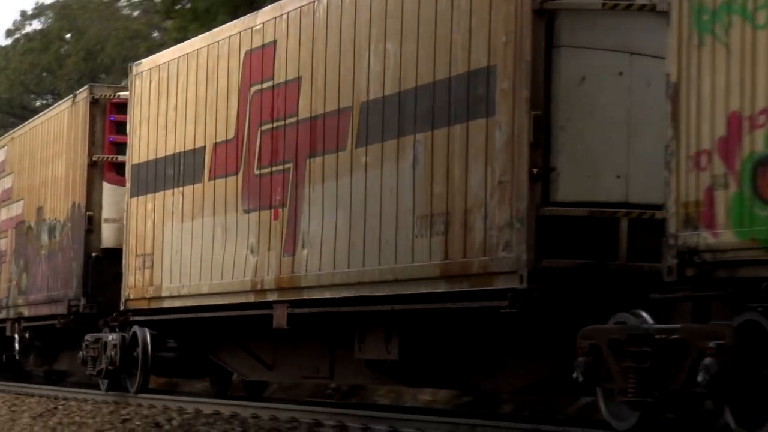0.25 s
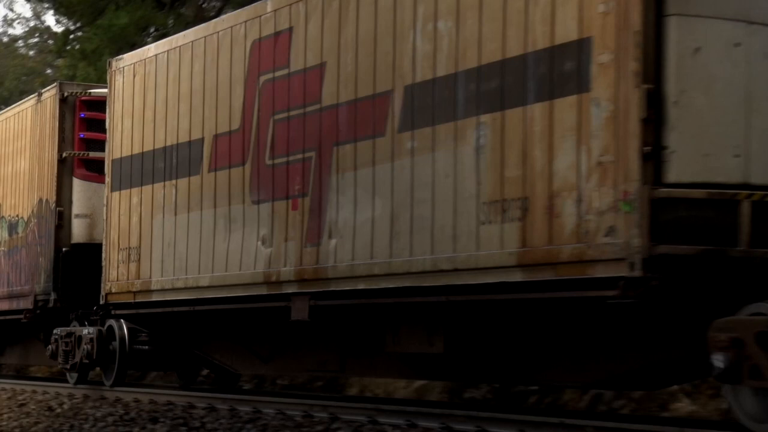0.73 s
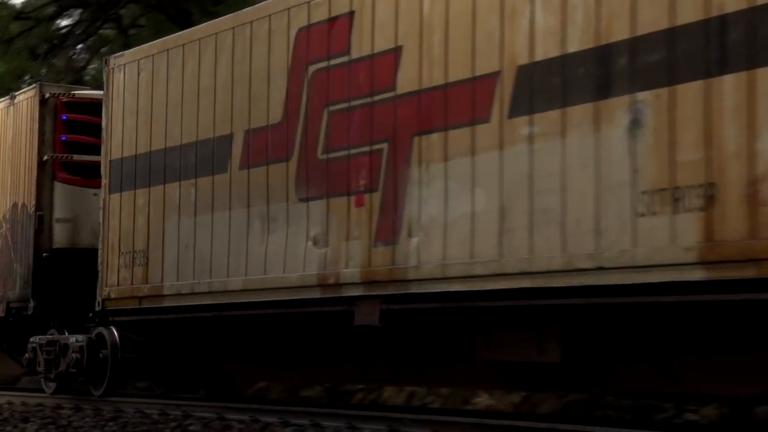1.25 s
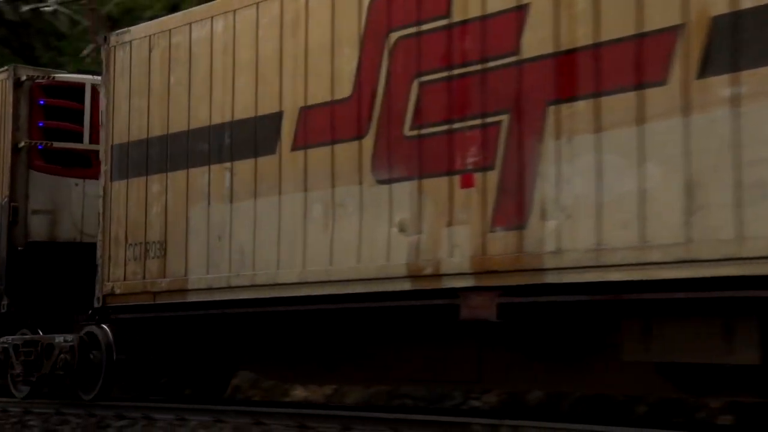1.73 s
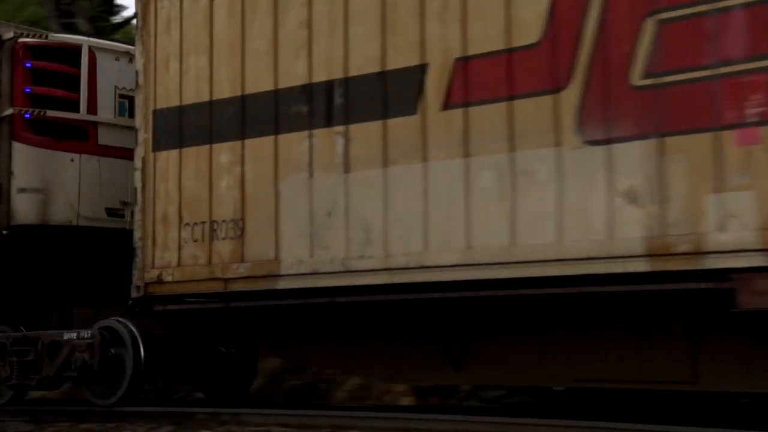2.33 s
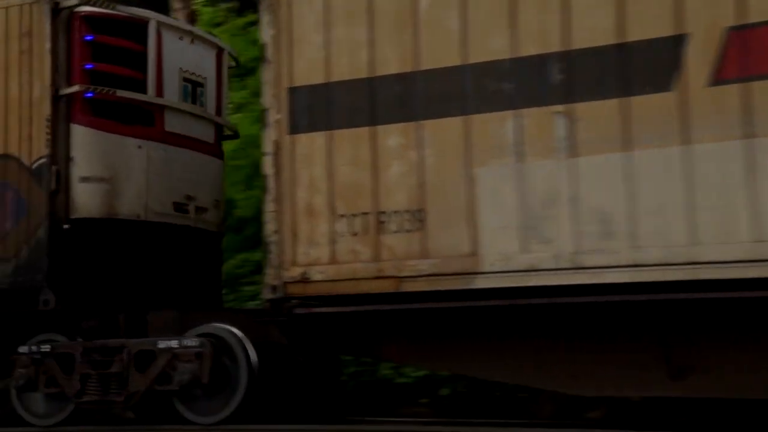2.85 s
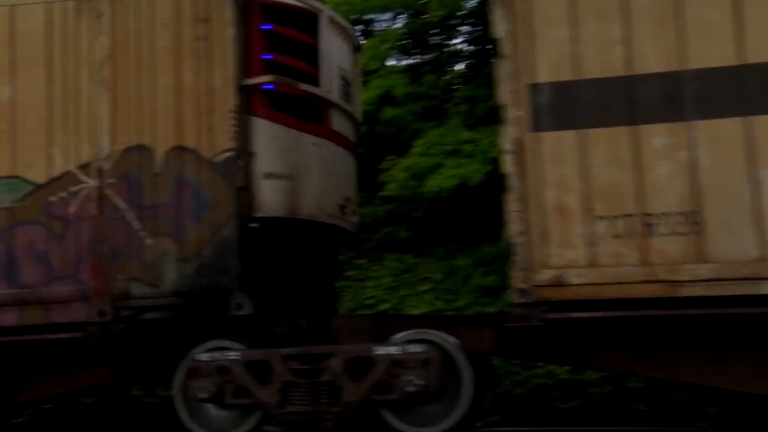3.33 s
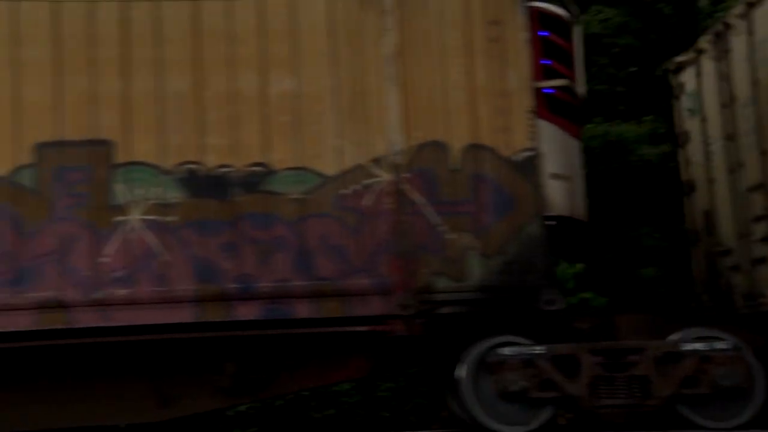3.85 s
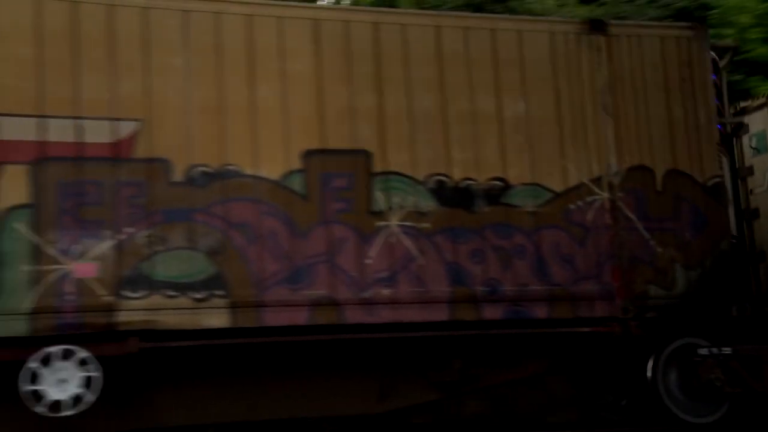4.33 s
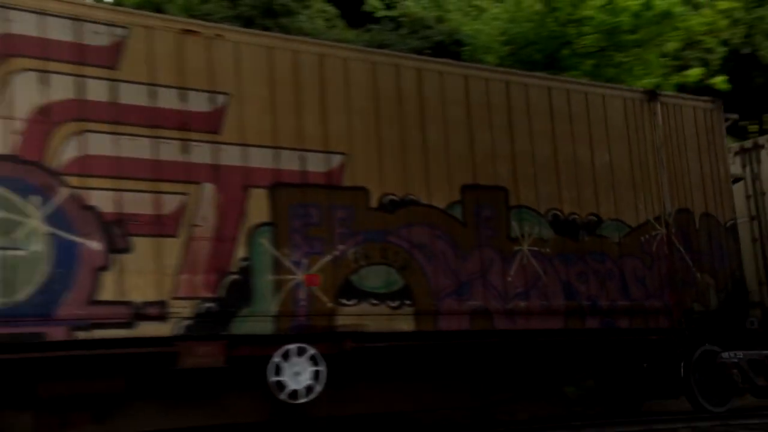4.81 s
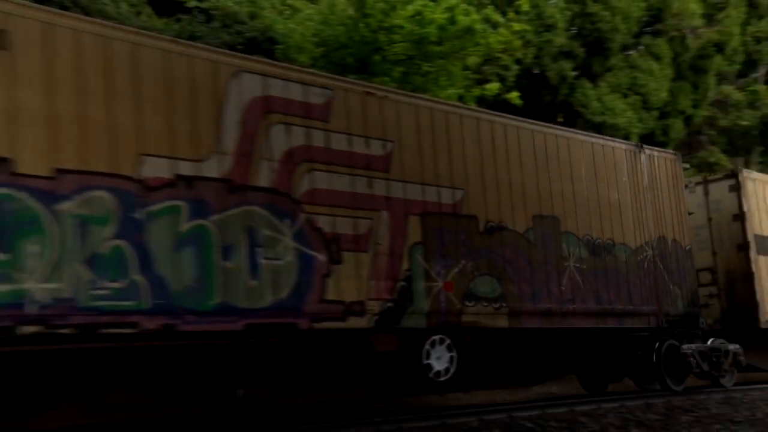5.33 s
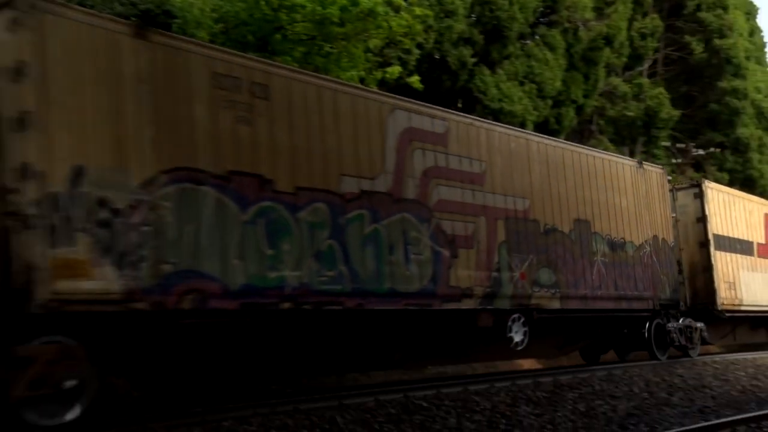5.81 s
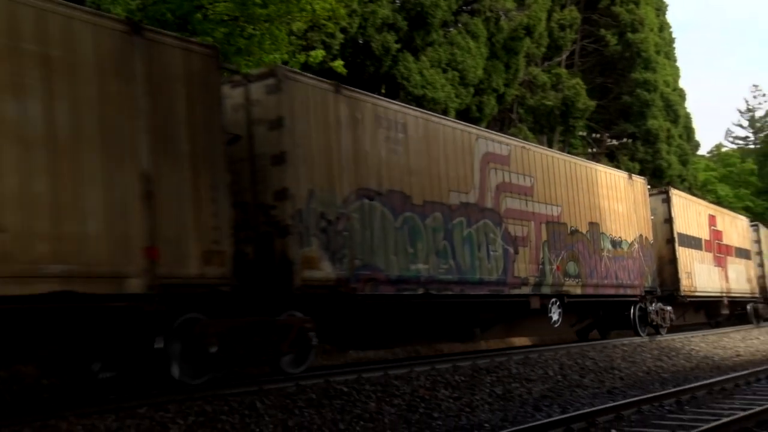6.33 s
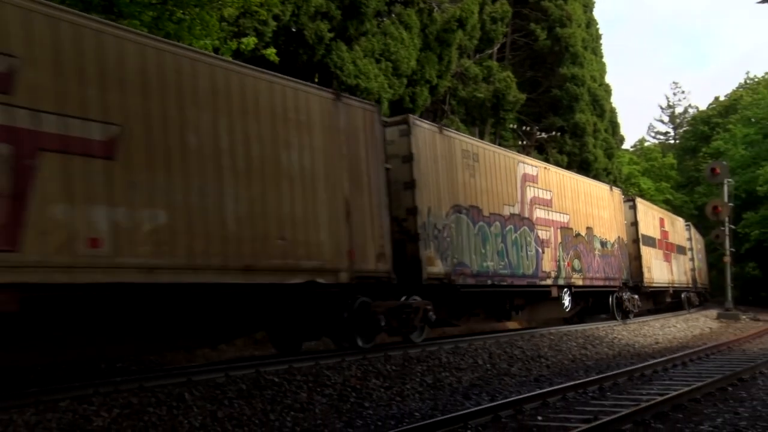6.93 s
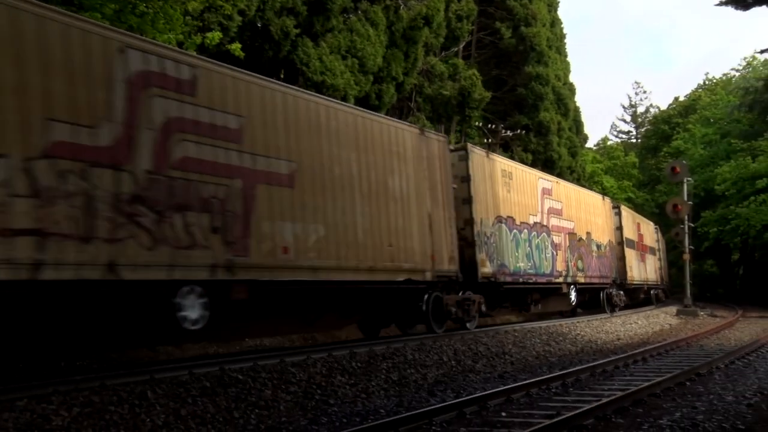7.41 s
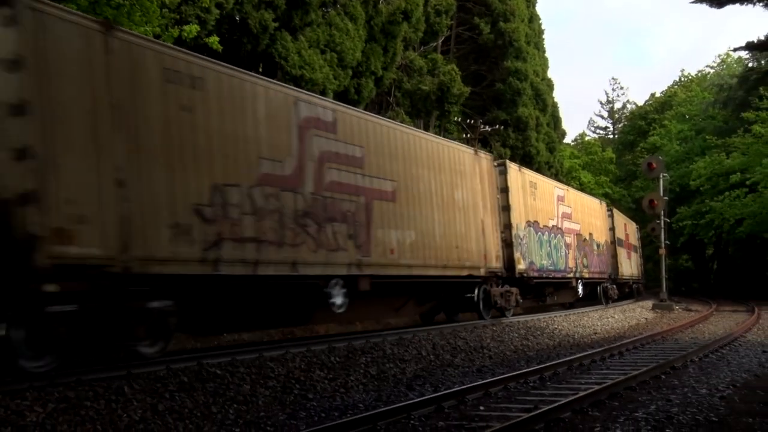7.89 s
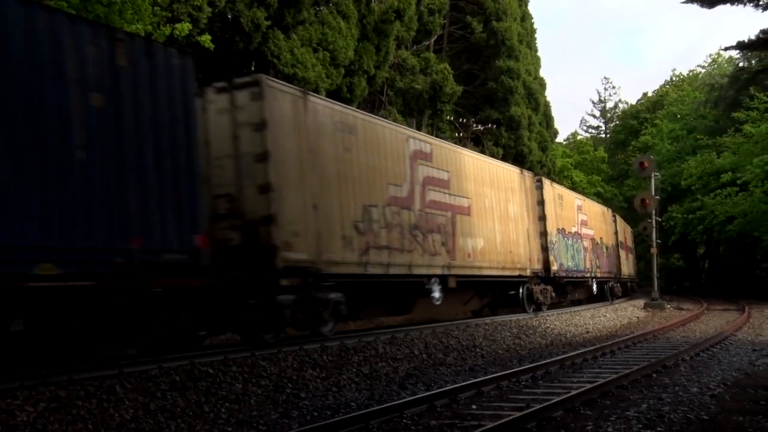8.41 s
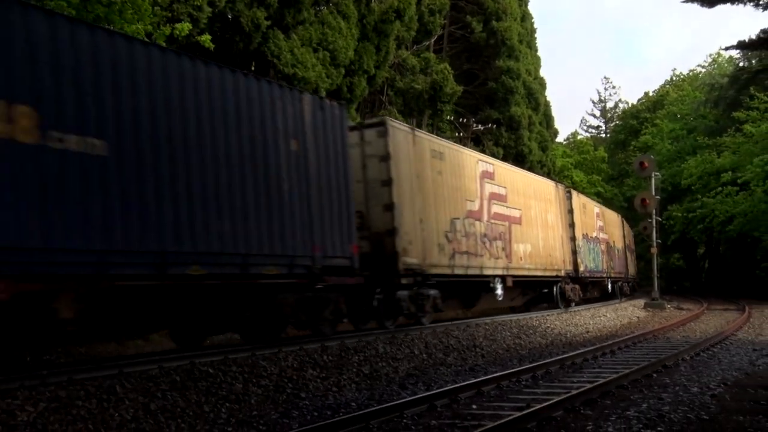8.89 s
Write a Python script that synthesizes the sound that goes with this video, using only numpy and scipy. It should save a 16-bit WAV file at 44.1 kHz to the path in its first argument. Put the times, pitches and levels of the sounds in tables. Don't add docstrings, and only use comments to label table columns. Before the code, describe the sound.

Open air, close beside a railway bend, with a fixed stereo microphone. A freight train is already passing at moderate speed. From 0 s a piercing squeal around 3.2 kHz dominates, rough and fluttering with tiny dropouts, loudest near 1.4 to 2.1 s and slightly overloaded. Its pitch slides down a little as the wheel passes at about 1.8 s; it then weakens, stutters and lets go around 3.1 s. Beneath run low rumble, mid rail roar and bright gritty flange friction. Very high, glassy squeals flare at the start, near 2 s and sharply at 3.4 s, while the main squeal faintly catches again from 3.6 to 5 s. Another thin squeal bursts at 5.2 s and a short one at 7.2 s. Friction thins to a soft hiss over rumble; from about 8 s, dull knocks and short metallic rings cluster, the heaviest low clunk near 9 s.

```python
import sys
import numpy as np
from scipy import signal
from scipy.io import wavfile
from scipy.ndimage import uniform_filter1d, map_coordinates

SR = 44100
rng = np.random.default_rng(int(sys.argv[2]) if len(sys.argv) > 2 else 0)


def log_audio(samples):
    frames = np.atleast_2d(samples).T
    limited = np.clip(frames, -1, 1)
    pcm = np.round(limited * 32767).astype(np.int16)
    wavfile.write(sys.argv[1], SR, pcm)


def undo_db(level):
    steps = np.asarray(level, float) / 20
    return 10 ** steps


N = 403515
TIME = np.arange(N) / SR

SPEED, DISTANCE, SOUND = 8.9, 9.8, 343

# (time [s], level [dB])
TRACK_LOAD = [
    (0.0, -35),
    (1.9, -35),
    (3.64, -38),
    (7.16, -40),
    (8.31, -37),
    (9.15, -35.5),
]
# (frequency [Hz], density [dB per Hz])
RUMBLE_COLOUR = [(21, -35), (36, -4.5), (65, -8), (97, 0.5), (124, -2), (187, -5), (226, -10.5),
                 (258, -15.5), (300, -20.5), (390, -51), (660, -120)]
# (frequency [Hz], density [dB per Hz])
RAIL_COLOUR = [(200, -28), (300, -8), (450, -4.5), (800, -3), (1100, -1), (1500, -3), (2200, -33)]
# (time [s], thud peak [dB], ring level [dB], ring frequency [Hz])
JOINTS = [
    (7.965, -26, -29, 1195),
    (8.36, -35, -36, 1240),
    (8.6, -25, -32, 1220),
    (8.73, -32, -32, 2140),
    (9.056, -24, -30, 473),
    (9.045, -44, -25, 2180),
]
# (time [s], flange pressure [dB], left over right [dB])
FLANGE = [(0.0, -29, -1.5), (0.97, -28, 0), (1.4, -27, -0.5), (1.65, -28, -0.5), (1.96, -28, -1),
          (3.82, -24, 0.0), (5.35, -29.5, 3), (5.73, -28, 3.0), (7.11, -32.5, 1), (7.31, -34.5, 1),
          (8.64, -38, 1), (9.15, -37, 1)]
USUAL_DB = -30
# (frequency [Hz], density [dB per Hz])
BODY_COLOUR = [(800, -45), (1200, -22), (1600, -4), (1850, 0.5), (2700, -1), (3600, 1), (4400, -22)]
# (frequency [Hz], density [dB per Hz])
FIZZ_COLOUR = [(3000, -38), (3900, -0.5), (4600, 2), (7000, -3.5), (9500, -4), (11400, -11), (12500, -32)]
# (frequency [Hz], density [dB per Hz])
TOP_COLOUR = [(10500, -30), (11600, 0.5), (14000, 1), (15700, -5), (17000, -10)]
# (level at middle pressure [dB], slope [dB per dB of pressure], drift [dB per s])
BODY_LAW = (-33.5, .85, 0.14)
FIZZ_LAW = (-30.5, 1.01, 0.013)
TOP_LAW = (-35.5, 1.1, -0.67)
RAIL_LAW = (-44, 0.69, 0.19)
BOGIE_PASSES = [-43, -7.5, -1.6, 0.5, 4, 5.4, 7.5, 9.5, 13.5]
# (frequency [Hz], width [Hz], level [dB])
WHEEL_MODES = [(1220, 17, -10.5), (1803, 64, -15.5), (2180, 68, -11.5), (2580, 73, -10), (4300, 41, -12.5),
               (5020, 26, -7.5), (5447, 63, -8), (5980, 50, -13), (6660, 120, -7.5), (7750, 180, -8.5),
               (8805, 120, -8.5), (9890, 80, -9), (10835, 96, -4), (12900, 150, -22), (13700, 140, -33),
               (14400, 150, -20)]

# (rest frequency [Hz], passing time [s])
LONG_WHEELS = [(10941, .25), (10935, 2), (11060, 3.5), (10952, 3.5), (10941, 5.35), (7740, .05),
               (7848, 3.6), (7752, 6.95)]
# (peak time [s], peak level [dB], rise [dB per s], fall [dB per s])
LONG_BURSTS = [
    [(0.0, -18, 21, 9), (1.8, -34, 8, 12)],
    [(1.9, -25, 30, 5), (3.0, -27, 3, 7)],
    [(3.3, -27, 9, 30), (2.2, -30, 40, 11)],
    [(3.43, -10.5, 38, 130), (2.8, -25, 15, 8), (3.77, -27, 40, 30)],
    [(5.23, -22, 30, 75), (4.9, -33, 6, 9), (6.3, -39, 12, 9)],
    [(0.0, -19.5, 21, 6), (.6, -25, 3, 13)],
    [(2.2, -26, 90, 50), (3.3, -23.5, 35, 33), (4.0, -27, 22, 35), (4.4, -31, 21, 45)],
    [(7.2, -19, 75, 95)],
]
LONG_LEAD = [2.4, 1.0, 0.01, -.15, 5.3, 4.6, .01, 3.9]
LONG_SCRAPE = [.35, .15, .2, .25, .2, .8, .3, .2]
REACH_S = 2.4
# (start time [s], length [s], rest frequency [Hz], passing time [s],
# level [dB])
FAINT_SQUEALS = [(4.5, .6, 7813, 5.35, -37), (5.3, .7, 7734, 3.7, -39), (4.9, .55, 10005, 5.35, -32),
                 (7.05, .35, 9889, 7.0, -42), (6.95, .45, 14430, 6.95, -39), (3, 1.9, 8951, 3.65, -37.5),
                 (7.1, .3, 10918, 6.95, -43), (5.45, .4, 5991, 5.7, -34), (3.4, .6, 6026, 3.85, -37),
                 (6.8, .55, 7800, 7.3, -36), (0.7, .5, 5482, 1.75, -38), (5.5, .45, 5456, 5.55, -36),
                 (0.1, .6, 9100, 0.35, -35), (5.55, .35, 4176, 5.8, -37), (8.66, .55, 2123, 9.8, -41),
                 (3.6, .5, 5048, 5.1, -40),
                 (2.4, 1.0, 1172, 8, -42), (5.7, 1.9, 1225, 3.6, -47), (7.95, .95, 1175, 12, -45),
             (4.7, .7, 2600, 5.4, -38), (3.3, .5, 2600, 3.6, -37), (8.75, .25, 4210, 10, -38),
             (3.75, .3, 5420, 5.4, -31), (3.05, .45, 5420, 5.4, -33), (7.5, .25, 4430, 9.3, -39)]
FAINT_LEAD, LEAD_SPREAD = -.6, .6

LOUD_HZ, LOUD_PASS = 3223, 1.85
# (time [s], level [dB])
LOUD_GRIP = [
    (0.0, -6.5),
    (0.6, -7),
    (1.0, -7.5),
    (1.4, -5),
    (1.68, -4),
    (2.08, -4.5),
    (2.5, -12.5),
    (2.85, -14),
    (3.15, -25.5),
]
# (time [s], level [dB])
LATE_GRIP = [
    (3.6, -20),
    (3.9, -25.5),
    (4.2, -32.5),
    (4.5, -25.5),
    (4.8, -29.5),
    (5.1, -36),
]
# (time [s], depth [dB], width [ms])
SAGS = [(.17, 7.5, 166), (.42, 5, 150), (.76, 8, 160), (1.08, 5, 94), (1.25, 3, 110), (1.5, 7.5, 67),
        (1.78, 9, 113), (1.92, 7, 140), (1.98, 10, 22), (2.04, -2, 120), (2.3, 5.5, 280), (2.65, 0, 200)]
# (time [s], depth [dB], width [ms])
SLIPS = [(0.189, 22, 7.8), (0.263, 11, 13), (0.394, 15, 5.7), (0.602, 6, 7.9), (0.663, 6, 8.9),
         (0.752, 3, 5.1), (0.81, 15, 8), (0.837, 10, 24), (0.932, 9, 27), (1.04, 10, 7.2), (1.126, 7, 7),
         (1.247, 18, 9.6), (1.758, 10, 45), (1.802, 8, 7.5), (1.864, 8, 6.4), (1.949, 6, 11),
         (2.24, 13, 28), (2.353, 27, 17), (2.412, 22, 15), (2.616, 25, 12), (2.641, 9, 4.1),
         (2.709, 19, 10), (2.781, -2, 24), (2.842, 17, 9.8), (2.914, 9, 16), (2.987, 17, 9.8),
         (0.954, 16, 6.7), (1.388, 16.5, 12), (1.409, 19, 8.2), (1.5, 9, 6.4), (1.535, 14, 14),
        (3.22, 4, 160), (3.45, 9, 190), (3.72, 6, 76), (4.02, 5, 120), (4.3, -4.5, 82), (4.48, 8, 140),
        (4.67, -4, 120), (4.87, 4, 68)]
# (frequency [Hz], density [dB per Hz])
HAZE_COLOUR = [(2950, -69), (3090, -20), (3160, -1), (3240, 6.5), (3330, -5), (3420, -8.5), (3600, -37)]
HAZE_DB, HAZE_AT, HAZE_BEND = -11.5, 1.12, 4.8
FAR_DB, FAR_FADE = -20.5, 1.87
LEAD_RAD, LEAD_PER_S, FLIP_RAD, FLIP_S, FLIP_AT = 0.1, .7, 2.474, 0.062, 1.79
PAN_DB, PAN_PER_S, PAN_FLIP_DB, PAN_LEAVING_DB = 3.5, -7, 7, -3


def unit(x):
    return x / np.sqrt(np.mean(x ** 2) + 1e-20)


def curves(rows):
    s, *cols = np.transpose(rows)
    return [np.interp(TIME, s, c) for c in cols]


def wobble(rate, size=N):
    knots = rng.standard_normal(int(size * rate / SR) + 4)
    return map_coordinates(knots, [np.arange(size) * rate / SR], order=1)


def fade(span, seconds):
    t = TIME[span]
    to_edge = np.minimum(t - t[0] + (t[0] == 0), t[-1] - t)
    return np.clip(to_edge / seconds, 0, 1)


def shape(spectrum, hz):
    f, db = np.transpose(spectrum)
    return unit(undo_db(np.interp(np.log(hz + 1), np.log(f), db, -120, -120)))


def follows(law, s):
    at, pressure_db, _ = np.transpose(FLANGE)
    middle_db, slope, drift = law
    return middle_db + slope * (np.interp(s, at, pressure_db) - USUAL_DB) + drift * s


def widen(pair, alike):
    turn = np.arccos(np.clip(alike, -1, 1)) / 2
    return np.cos(turn) * pair[0] + np.sin(turn) * pair[1] * [[1], [-1]]


def noise(field, alike, size):
    hz, s, z = signal.stft(rng.standard_normal((2, N)), SR, nperseg=size)
    patches = uniform_filter1d(rng.standard_normal(z.shape[1:]), 500 * size // SR, 0)
    patches = uniform_filter1d(patches, SR // (8 * size) + 1, 1)
    coloured = z * field(hz, s) * undo_db(1.09 * unit(patches))
    pair = signal.istft(coloured, SR, nperseg=size)[1][:, :N]
    return widen(pair, alike)


def rush(spectrum, alike, size=2048):
    return noise(lambda hz, s: shape(spectrum, hz)[:, None], alike, size=size)


def heard(t, passes):
    return t - np.hypot(DISTANCE, SPEED * (t - passes)) / SOUND


def squeal(span, rest_hz, passes, level_db, lead, drift_hz, slip_db):
    t = TIME[span]
    drift_cycles = np.cumsum(drift_hz * wobble(30, size=len(t))) / SR
    phase = 2 * np.pi * (rest_hz * heard(t, passes) + drift_cycles)
    gain = np.sqrt(2) * undo_db(level_db + slip_db * wobble(35, size=len(t)))
    return gain, np.array([phase + lead / 2, phase - lead / 2])


def rolling():
    load_db = curves(TRACK_LOAD)[0]
    rumble = undo_db(load_db + 1.0 + 0.5 * wobble(7)) * rush(RUMBLE_COLOUR, alike=0.58, size=8192)
    rail_db = follows(RAIL_LAW, TIME) + 0.7 * (load_db + 38) + 3.0
    rail = undo_db(rail_db + 0.64 * wobble(13)) * rush(RAIL_COLOUR, alike=0.51)
    return rumble + rail


def joints():
    out, t = np.zeros(N + SR), np.arange(SR // 3) / SR
    band = signal.butter(2, [300, 900], "bandpass", fs=SR, output="sos")
    for s, thud_db, ring_db, ring_hz in JOINTS:
        thud = undo_db(thud_db - 60 * t / 0.075) * np.sin(2 * np.pi * 130 * t)
        knock_noise = unit(signal.sosfilt(band, rng.standard_normal(len(t))))
        knock = undo_db(thud_db - 14 - 60 * t / 0.48) * knock_noise
        rough = 0.59 + 1.0 * wobble(123, size=len(t))
        ring = undo_db(ring_db - 6.5 - 60 * t / 0.54) * rough * np.sin(2 * np.pi * ring_hz * t)
        onset = 1 - np.exp(-t / 0.0033)
        out[round(s * SR):][:len(t)] += (thud + knock + ring) * onset
    return out[:N] * undo_db([[.5], [-.5]])


def bogies(hz, s):
    power, total = 0, 0
    for passes in np.add.outer(BOGIE_PASSES, [-.2, .2]).ravel():
        ring = 0
        for centre, width, db in WHEEL_MODES:
            centre_hz = centre * (1 + 0.0029 * rng.normal())
            mode_db = db + 1.94 * rng.normal()
            ring = ring + undo_db(2 * mode_db) / (1 + (3.9 * (hz - centre_hz) / width) ** 2)
        doppler = np.gradient(heard(s, passes), s)
        spreading = np.hypot(DISTANCE, SPEED * (s - passes)) ** -1.6
        near = spreading * undo_db(6 * wobble(1500, size=len(s)))
        power = power + near * np.interp(hz[:, None] / doppler, hz, ring / ring.mean())
        total = total + near
    return power / total


def grinding():
    pan_db = curves(FLANGE)[1]

    def layer(spectrum, law, hz, s):
        return (shape(spectrum, hz)[:, None] * undo_db(follows(law, s))) ** 2

    def field(hz, s):
        broad = layer(BODY_COLOUR, BODY_LAW, hz, s) + layer(FIZZ_COLOUR, FIZZ_LAW, hz, s)
        broad = broad + layer(TOP_COLOUR, TOP_LAW, hz, s)
        modes = undo_db(2 * (follows(FIZZ_LAW, s) + 3.5)) * bogies(hz, s)
        return np.sqrt(broad + modes)

    balance = undo_db(1.17 * wobble(14) + [pan_db / 2, -pan_db / 2])
    return balance * noise(field, alike=0.73, size=2048)


def long_squeals():
    out = np.zeros((2, N))
    for (rest_hz, passes), lead, rough, bursts in zip(LONG_WHEELS, LONG_LEAD, LONG_SCRAPE, LONG_BURSTS):
        span = slice(max(0, round((passes - REACH_S) * SR)), min(N, round((passes + REACH_S) * SR)))
        t = TIME[span]
        slopes = [db - np.maximum(rise * (s - t), fall * (t - s)) for s, db, rise, fall in bursts]
        level_db = np.max(slopes, 0)
        wandering_lead = lead + .3 * wobble(5, size=len(t))
        gain, phase = squeal(span, rest_hz, passes, level_db, wandering_lead, drift_hz=6, slip_db=5)
        scrape = np.array([wobble(220, size=len(t)), wobble(220, size=len(t))])
        texture = 1 - rough + rough * 1.3 * scrape
        out[:, span] += fade(span, .08) * gain * texture * np.sin(phase)
    return out


def faint_squeals():
    out = np.zeros((2, N))
    for start, length, rest_hz, passes, level_db in FAINT_SQUEALS:
        span = slice(round(start * SR), min(N, round((start + length) * SR)))
        flicker_db = 1.7 * wobble(6.4, size=span.stop - span.start)
        lead = (FAINT_LEAD + LEAD_SPREAD * rng.normal()) * rest_hz / 8000
        gain, phase = squeal(span, rest_hz, passes, level_db - 3.0 + flicker_db, lead, drift_hz=11, slip_db=4.5)
        out[:, span] += fade(span, 0.1) * gain * np.sin(phase)
    return out


def dips(table):
    out = np.zeros(N)
    for s, depth_db, ms in table:
        near = slice(max(0, round((s - .3) * SR)), round((s + .3) * SR))
        out[near] -= depth_db * np.exp(-((TIME[near] - s) * 1600 / ms) ** 2)
    return out


def haze(grip_db, slip_db):
    sides = undo_db(HAZE_DB - HAZE_BEND * (TIME - HAZE_AT) ** 2)
    far = undo_db(FAR_DB - FAR_FADE * TIME)
    sway_db = 0.28 * slip_db - 0.86 * np.maximum(grip_db + 4.5, 0) + 2.14 * wobble(12)
    return np.hypot(sides, far) * undo_db(sway_db) * rush(HAZE_COLOUR, alike=0.24)


def loud_wheel():
    span = slice(0, round(LATE_GRIP[-1][0] * SR))
    t = TIME[span]
    grip_db = curves(LOUD_GRIP + LATE_GRIP)[0] + dips(SAGS)
    slip_db = dips(SLIPS)
    nearing = np.minimum(t, FLIP_AT)
    flip = (1 + np.tanh((t - FLIP_AT - FLIP_S) / FLIP_S)) / 2
    lead = LEAD_RAD + LEAD_PER_S * nearing + FLIP_RAD * flip
    pan_db = PAN_DB + PAN_PER_S * nearing + PAN_FLIP_DB * flip + PAN_LEAVING_DB * np.maximum(t - 2.9, 0)
    level_db = grip_db + 1.5 + 1.15 * np.maximum(grip_db + 8.5, 0)
    gain, phase = squeal(span, LOUD_HZ, LOUD_PASS, (level_db + slip_db)[span], lead, drift_hz=3.526, slip_db=1.5)
    octave_gain = undo_db(-25 + 4.2 * wobble(58.43, size=span.stop)) * gain
    tone = np.sin(phase) + octave_gain * np.sin(2 * phase)
    out = haze(grip_db, slip_db)
    out[:, span] += fade(span, 0.091) * gain * undo_db([pan_db / 2, -pan_db / 2]) * tone
    return out


def scene():
    return rolling() + joints() + grinding() + long_squeals() + faint_squeals() + loud_wheel()


def low_pass(x):
    return signal.sosfilt(signal.butter(12, 16150, fs=SR, output="sos"), x)


def record(dry):
    top, hard = .86, 5.5
    saturated = dry / (1 + abs(dry / top) ** hard) ** (1 / hard)
    return low_pass(saturated)


dry = scene()
out = record(dry)
log_audio(out)
```